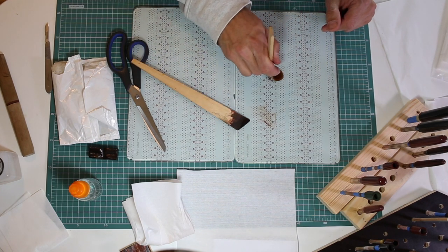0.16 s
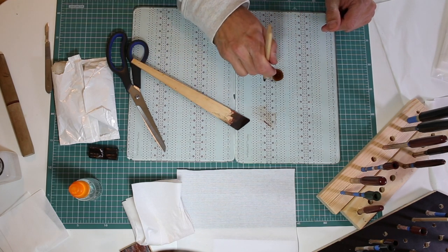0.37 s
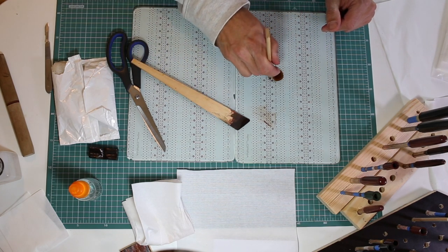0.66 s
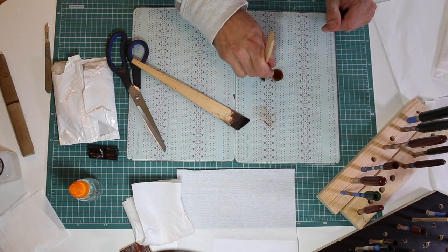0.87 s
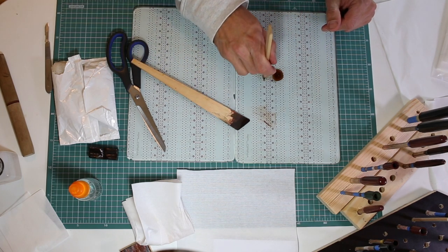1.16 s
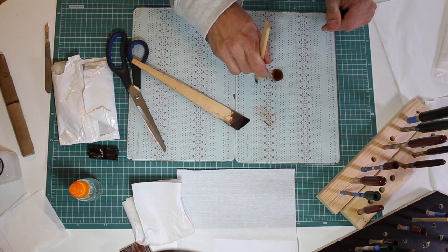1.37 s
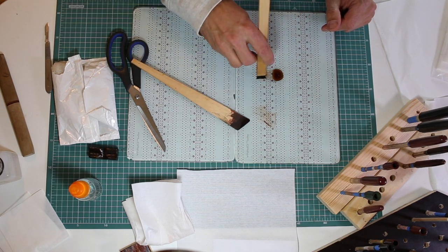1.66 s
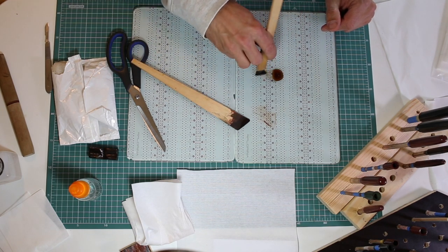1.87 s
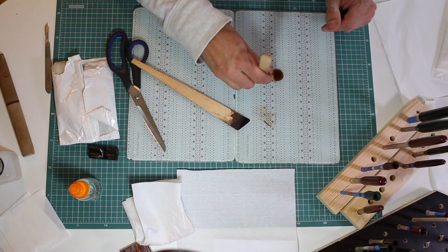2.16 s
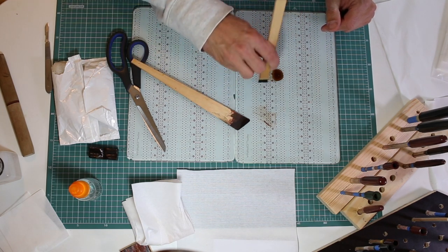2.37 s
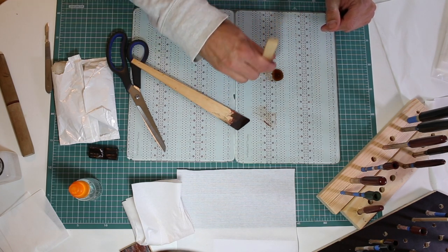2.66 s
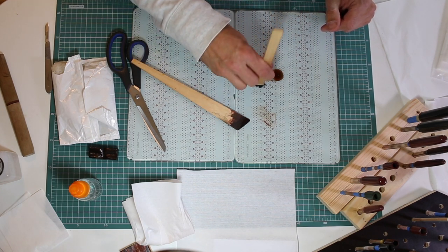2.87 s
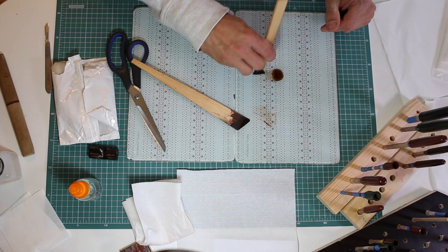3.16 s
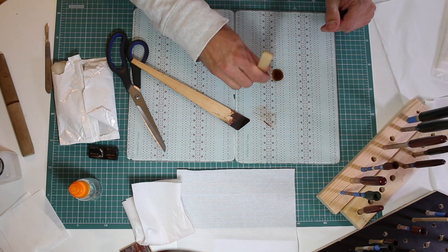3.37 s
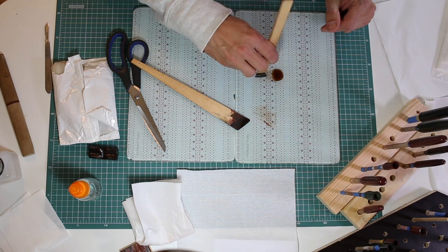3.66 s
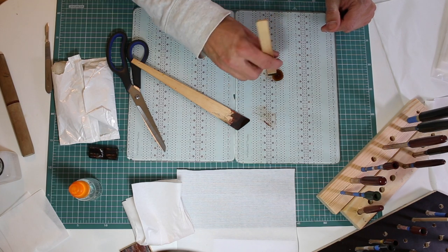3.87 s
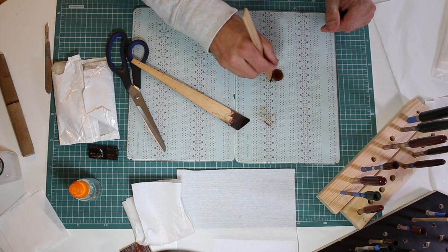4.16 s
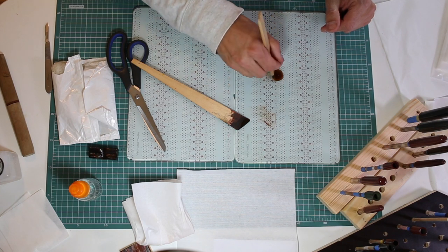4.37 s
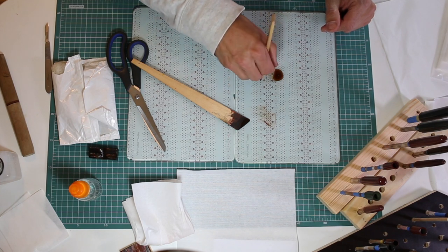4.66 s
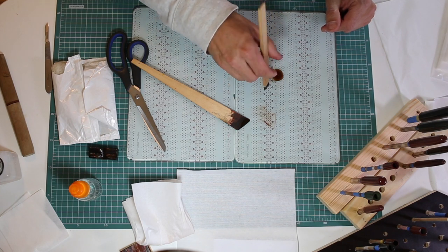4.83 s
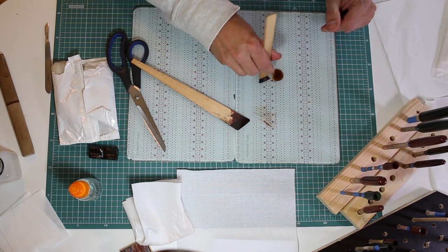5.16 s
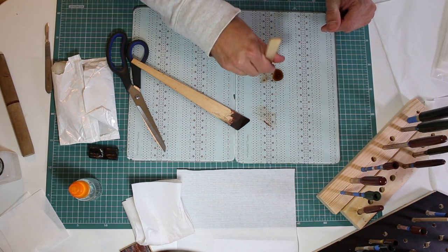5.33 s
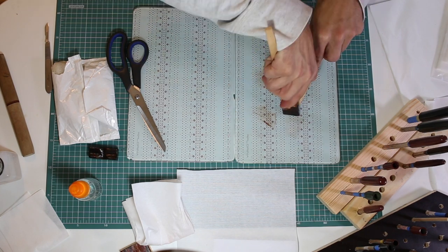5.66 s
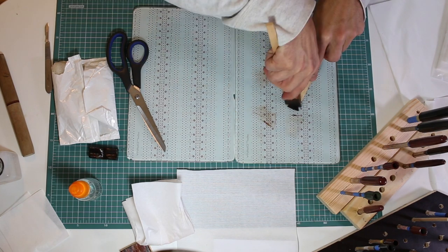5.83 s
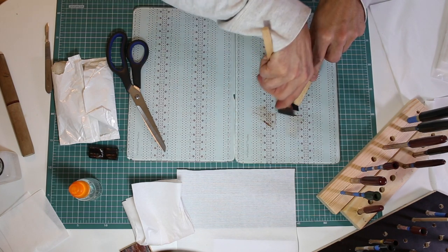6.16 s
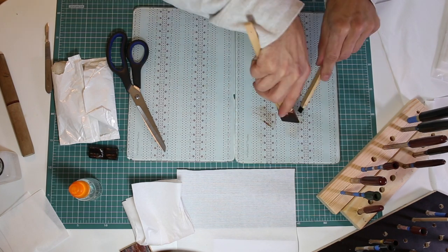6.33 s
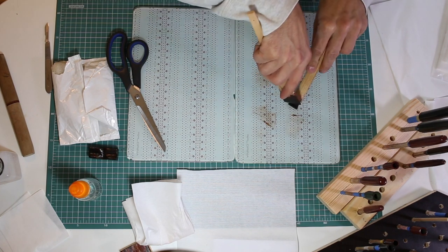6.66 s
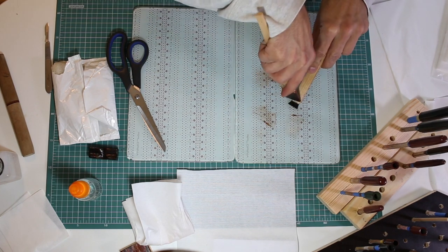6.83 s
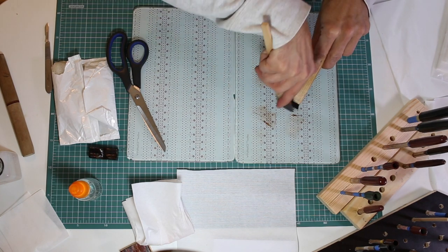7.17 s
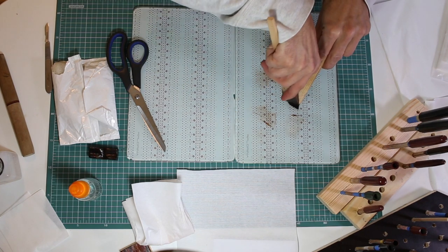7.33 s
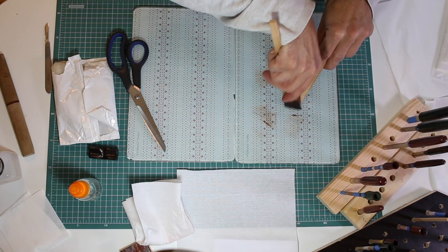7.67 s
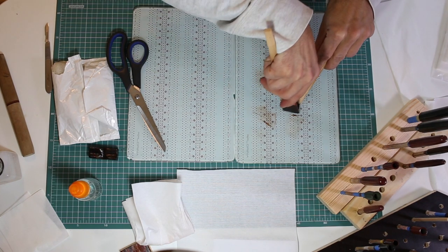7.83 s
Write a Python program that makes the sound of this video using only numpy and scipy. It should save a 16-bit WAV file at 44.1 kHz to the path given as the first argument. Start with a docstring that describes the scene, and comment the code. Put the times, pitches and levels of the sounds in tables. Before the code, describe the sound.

A brush is tapped lightly and turned in the fingers, then a wooden spatula strikes and scrapes it hard, making the table thump.

```python
"""Brush and spatula on a hard plate

A flat brush is dabbed on a hard plate and turned in the fingers, then a wooden spatula strikes and scrapes it out.
Blows ring short wood modes and longer plate modes, and thud in the table; fingers and edge are shaped noise.
Pressing makes the table boom on a low, wavering tone. A small workshop adds echo and a steady hush.
"""
import sys
import numpy as np
from scipy import signal
from scipy.fft import rfft, irfft
from scipy.io import wavfile
from scipy.ndimage import uniform_filter1d

SR = 44100
rng = np.random.default_rng(int(sys.argv[2]) if len(sys.argv) > 2 else 0)


def master_out(mix):
    """Clip the mix to full scale and print it as 16-bit PCM to the path in sys.argv[1]."""
    frames = np.transpose(np.atleast_2d(mix))
    ceiling = np.clip(frames, -1, 1)
    pcm = np.round(ceiling * 32767).astype(np.int16)
    wavfile.write(sys.argv[1], SR, pcm)


N = 352800  # 8 s of samples

# Hush of the workshop, and its level: pitch_hz, density_db_per_hz
AIR_COLOUR = [(15, -10), (25, -11), (59, -10), (75, -5), (140, -1), (184, -3.5), (216, -5), (402, -11),
              (688, -11), (746, -10.5), (1120, -13.5), (3970, -19.5), (6810, -29.5), (11400, -22.5),
              (15700, -28)]
AIR_DB = -57.5
# How long the echo lasts at each pitch: pitch_hz, time_to_fall_60_db_s
ROOM_T60 = [(150, 0.92), (1000, 0.37), (4000, 0.5), (8000, 0.16), (14000, .18)]
# Echo level, delay of the nearest wall and strength of its answer; the echo hears less of plate and table
ROOM_DB, FIRST_WALL_S, WALL_DB, BODY_ROOM_DB = -7, 0.0257, -4, -8

# Presses of the spatula that swing a low table mode:
# full_swing_s, build_up_s, level_db, time_to_fall_60_db_s, deep_shaking_re_level_db
PRESSES = [(5.685, 0.048, -26, 0.46, -12), (5.93, 0.052, -26.5, 0.77, -17), (5.98, .04, -28, .52, -26),
           (6.16, .06, -32.5, 0.25, -9), (6.23, .04, -49.5, 1.7, -3), (6.955, 0.042, -30.5, .9, -21),
           (7.02, 0.093, -28.5, 0.56, -33), (7.13, 0.15, -32, 0.69, -30), (7.395, 0.036, -23.5, 0.21, -17),
           (7.5, 0.16, -33.5, 0.32, -5), (7.71, .04, -27.5, 1, -15), (7.75, 0.057, -26, 0.58, -25)]
BOOM_HZ = 117
# The frame jolts before the mode has built up, and dies in this share of its time
SHAKE_LEAD_S, SHAKE_FADE = 0.023, 0.61

# Colour of one thin, dry tick, as of a fingernail on the handle: pitch_hz, density_db_per_hz
TICK_COLOUR = [(800, -20), (2000, -2), (4100, 0), (6500, -5), (10800, -17), (15500, -35)]
TICK_S, TICK_DB, TICK_T60_S = 3.215, -21, .01

# Fingers and bristles sliding on the handle: full_hiss_s, swell_s, hold_s, fade_s, hiss_db,
# lowest_mode_re_hiss_db, next_two_modes_re_hiss_db, upper_modes_re_hiss_db
RUBS = [(1.38, .03, .003, .04, -68, -11, -13, -6), (1.455, .015, 0.033, .11, -60, -9, -9, -8),
        (1.52, .12, .045, .06, -57, -8, -4, -10), (1.59, 0.14, .012, 0.11, -54.5, -15, -13, -0.5),
        (1.872, .055, .003, .09, -61, -9, -12, -8.5), (2.346, .016, .003, 0.029, -59, -12, -16, -10),
        (2.5, .04, .003, 0.033, -58, -1, -11, -18), (2.868, 0.16, .003, 0.038, -52.5, -4, -9, -20),
        (2.988, 0.18, 0.0028, 0.025, -60.5, -18, -19, -21), (3.36, .012, .003, 0.05, -60, -18, -9, -6),
        (3.41, .011, .003, 0.035, -51.5, -10, -13, -17), (3.5, .028, .003, 0.032, -62.5, -15, -13, -4),
        (3.67, .09, .012, .03, -65, -2, -15, -4), (3.752, .025, .003, .045, -67, -11, -15, -1.5),
        (3.93, 0.019, .003, .035, -59, -15, -15, -2), (3.985, 0.053, .066, .025, -51.5, -15, -5, -2),
        (4.082, .03, .015, .12, -53, -15, -7.5, -1), (4.694, .011, .003, .05, -69, -11, -16, -3.5),
        (4.912, 0.11, .003, .08, -61.5, -16, -2.5, -0.6), (4.968, .04, .003, 0.064, -56, -21, -2, -3),
        (5.022, .07, .003, .085, -57.5, -12, -7, -7), (5.48, .017, .003, .055, -59, -12, -15, -13)]
# Narrow modes of the handle: pitch_hz, width_hz, level_db
HANDLE_MODES = [(2170, 120, 0), (3450, 300, -8), (4880, 320, 0), (7500, 200, -3), (8550, 200, 0),
                (9660, 160, -3), (10800, 160, -3), (12200, 160, -1)]
# Hiss of skin and hair: pitch_hz, density_db_per_hz
SKIN_COLOUR = [(880, -32), (1500, -6), (2220, -3.5), (4130, -4), (4920, -22), (5880, -6), (8540, -1),
               (12200, 0), (15700, -11.5)]

# Drags of the spatula edge over bristles and plate: full_hiss_s, swell_s, hold_s, fade_s, hiss_db,
# wood_rasp_re_hiss_db, plate_rumble_re_hiss_db
SCRAPES = [(5.644, .012, 0.016, .035, -40.5, -9, 2), (5.898, .008, .035, 0.021, -44.5, -2, 6.5),
           (6.129, 0.0048, 0.0024, 0.017, -48, -13, 5), (6.154, 0.025, 0.014, .03, -44, -1, 0.5),
           (6.313, 0.015, 0.045, 0.026, -47, -7.5, -15), (6.41, .05, 0.0091, .06, -58.5, -12, -13),
           (6.478, .012, 0.022, 0.058, -56.5, -6, -7), (6.564, 0.17, .003, 0.084, -64, 7, 5.5),
           (6.634, 0.048, 0.044, 0.069, -50.5, 2.5, -9.5), (6.776, .008, .003, 0.055, -57, 6.5, -6),
           (6.845, .13, .003, .19, -57.5, 4, -7), (6.921, 0.0086, 0.025, 0.055, -47.5, -14, 3.5),
           (7.048, .25, .003, .03, -57, -1, 9), (7.061, .006, 0.026, 0.026, -47, -7, -1),
           (7.285, .04, 0.035, .03, -73.5, 10, 18.5), (7.353, 0.01, 0.022, 0.052, -45, -3, 10),
           (7.42, .03, .003, .06, -48.5, 2, -5), (7.686, .008, 0.055, 0.018, -43.5, 1.5, 4.5)]
# Hiss of the edge over the hair: pitch_hz, density_db_per_hz
EDGE_COLOUR = [(880, -41), (1500, -29.5), (1790, 0), (2200, 1), (2430, -7), (3290, -1), (4170, -2),
               (6110, -3), (10500, 7), (14700, -7), (15700, -25)]
# Wood and plate follow the hiss late, and fade this many times slower
RASP_LAG_S, RASP_FADE, RUMBLE_LAG_S, RUMBLE_FADE = 0.0051, 1.23, 0.008, 1.45

# Blows on the plate: start_s, wood_peak_db, strongest_ring_hz, upper_ring_hz,
# upper_ring_re_strongest_db, crack_re_peak_db, table_thud_re_peak_db
BLOWS = [(0.771, -39, 1031, 1930, -20, -25.5, -7.5), (0.843, -40.5, 963, 2200, -14, -12, -15),
         (1.252, -27, 1190, 2860, -16, -11.5, -11.5), (1.819, -48, 1030, 1900, -18, -14, -17),
         (2.128, -17, 1610, 2470, -15.5, -16, -16), (2.465, -30, 825, 2030, -6.5, -31.5, -13),
         (2.768, -18.5, 1090, 2030, -13, -20, -10), (3.352, -26.5, 1000, 2530, -19.5, -27, -6.5),
         (3.419, -36.5, 1080, 2290, 0, -17.5, -7), (3.63, -32, 980, 2870, -16.5, -18, -11.5),
         (5.189, -44, 703, 2010, -7, -2, -14), (5.468, -24, 1160, 2510, -18.5, -26.5, -11),
         (5.629, -21.5, 1670, 4760, -5, 7.5, -17), (5.672, -20.5, 920, 4120, -17, -17, -11),
         (5.889, -19.5, 1040, 2010, -2, 6.5, -16), (5.929, -14, 1080, 2450, -5.5, -5, -14.5),
         (6.128, -36, 699, 2910, -13, -6.5, -8.5), (6.168, -18.5, 970, 2450, -6, -12, -9.5),
         (6.773, -41, 1070, 2010, -8.5, -9, -31), (6.815, -36.5, 1020, 2040, -6, -17, -26.5),
         (6.877, -33.5, 1040, 1900, -11, -24.5, -28), (6.885, -31.5, 1030, 2420, -6, -16.5, -20),
         (6.915, -26.5, 968, 4170, -2, -0.5, -13), (6.997, -33.5, 1060, 1950, -16, -21.5, -7),
         (7.035, -36, 1090, 2160, -17, -14, -3.5), (7.061, -25, 965, 1960, -8.5, -9, -5.5),
         (7.1, -36, 1080, 2440, 4, 7.5, -5), (7.347, -23, 920, 4570, -8, 12, -7.5),
         (7.424, -12, 990, 1960, -12, -13.5, -10), (7.673, -26, 1025, 4290, -2, 9, -22),
         (7.729, -10.5, 1090, 3020, -6.5, -15, -16.5)]
# Short modes of the wood on the plate, before each blow scales the time:
# pitch_hz, level_db, time_to_fall_60_db_s
WOOD_MODES = [(619, 4, 0.026), (716.3, -2.5, 0.061), (970, -4, 0.035), (1066.6, 3.5, 0.036),
              (1338, -12, 0.093), (1462, 3.5, 0.032), (1610, -2.5, 0.039), (1950, 2.5, 0.035),
              (2450, 6, 0.029), (2608, -3, 0.051), (2860, 5, 0.03), (3560, 0.5, 0.038), (3998, -2, 0.059),
              (4580, -5, 0.032), (4520, 7.5, 0.011)]
# Modes of the table top, before blows() scales the time: pitch_hz, level_db, time_to_fall_60_db_s
TABLE_MODES = [(62.2, -16.5, 0.16), (109.3, -18, 0.32), (155.4, 2.5, 0.12), (183.8, -5.5, 0.1304),
               (226.4, -8.5, 0.11), (298, 5, 0.072), (366.7, -5.5, 0.11), (439.8, 2, 0.071)]
# Lasting plate modes, before blows() scales the time: pitch_hz, level_db, time_to_fall_60_db_s
PLATE_MODES = [(1100, -6, .3), (1440, 0, .45), (1595, -7, .25), (2030, -8, .3), (2450, -13, .25)]
# Crack of the hard edge: pitch_hz, density_db_per_hz
CRACK_COLOUR = [(880, -26), (1500, 2), (2540, -8), (3180, 1.5), (3960, 1.5), (4730, 6.5), (5880, -10),
                (7540, -1.5), (9100, 2.5), (12100, -5.5), (16000, -36)]
# A blow with a weak upper ring is softer: it keeps to its one mode and rings longer
FOCUS_DB_PER_OCTAVE, FOCUS_PER_DB, LENGTH, LENGTH_PER_DB = 2.5, 0.9, 0.44, 0.0219
# Plate ring relative to a 0 dB blow; light blows ring it relatively more
PLATE_DB, PLATE_PER_DB = -36, 0.2169

TOP_HZ = 15750  # the treble ends here


def undb(db):
    """Turn decibels into a plain multiplier."""
    return 10 ** (np.asarray(db) / 20)


def unit(x):
    """Scale a sound to an average (rms) level of 1."""
    return x / np.sqrt(np.mean(x ** 2))


def colour(x, table):
    """Shape a sound's spectrum by (Hz, dB) points, joined on a log pitch scale."""
    hz, db = np.transpose(table)
    bin_hz = np.arange(len(x) // 2 + 1) * SR / len(x) + 1
    gain = undb(np.interp(np.log(bin_hz), np.log(hz), db))
    return unit(irfft(rfft(x) * gain, len(x)))


def band(x, hz, width_hz):
    """Keep one band of pitches, as a single resonance does."""
    return unit(signal.lfilter(*signal.iirpeak(hz, hz / width_hz, SR), x))


def walk(rate):
    """Wander smoothly between random values, `rate` of them per second, with an rms of 1."""
    step = int(SR / rate)
    held = np.repeat(rng.standard_normal(N // step + 1), step)
    return unit(uniform_filter1d(held, step)[:N])


def grit(spread_db):
    """Make the noise of dense slips of uneven size."""
    size = np.minimum(rng.exponential(size=N), 5.5)
    return unit(rng.standard_normal(N) * undb(spread_db * size))


def strokes(s, rise_s, hold_s, fall_s, db):
    """Swell 20 dB in rise_s up to time s, hold, and fall 20 dB in fall_s; the loudest swell counts."""
    t, level = np.arange(N) / SR, np.zeros(N)
    for at, rise, hold, fall, peak_db in np.broadcast(s, rise_s, hold_s, fall_s, db):
        # each swell is followed down to 40 dB below its peak
        near = slice(max(int((at - 2 * rise) * SR), 0), int((at + hold + 2 * fall) * SR))
        before = (at - t[near]) / rise
        after = (t[near] - at - hold) / fall
        under = np.maximum(np.maximum(before, after), 0)
        level[near] = np.maximum(level[near], undb(peak_db - 20 * under))
    return level


def ring(modes, t, gain_db, swell, length):
    """Sum decaying modes under a swell that stands for the contact time; the peak is 1."""
    hz, db, t60 = np.transpose(modes)[:, :, None]
    decay = undb(db + gain_db[:, None] - 60 * t / (t60 * length))
    x = (decay * np.sin(2 * np.pi * hz * t)).sum(axis=0) * swell
    return x / np.abs(x).max()


def air():
    """Steady workshop hush, coloured from noise; only its bass swells and sinks."""
    hush = colour(rng.standard_normal(N), AIR_COLOUR)
    bass = signal.lfilter(*signal.butter(1, 400, fs=SR), hush)
    bass_gain = undb(0.47 * walk(2.48))
    return undb(AIR_DB) * (hush + (bass_gain - 1) * bass)


def room(x):
    """Diffuse echo, octave by octave, filling in until the nearest wall answers with a short cluster."""
    t = np.arange(int(.7 * SR)) / SR
    hz, t60 = np.transpose(ROOM_T60)
    tail = np.zeros(len(t))
    for f in 125 * 2. ** np.arange(7):
        fade = undb(-60 * t / np.interp(np.log(f), np.log(hz), t60))
        # a wider octave holds more noise
        tail += band(rng.standard_normal(len(t)), f, f * 0.642) * np.sqrt(f) * fade
    fill_in = np.clip(t / FIRST_WALL_S, 0, 1) ** 0.48
    cluster = np.exp(-((t - FIRST_WALL_S - .008) / 0.0019) ** 2)
    tail *= fill_in * (1 + undb(WALL_DB) * cluster)
    return signal.fftconvolve(x, tail / np.sqrt(np.sum(tail ** 2)))[:N]


def boom():
    """Pressure swings one low table mode, wavering a little in pitch, over an irregular deep shaking."""
    s, rise, db, t60, deep_db = np.transpose(PRESSES)
    fall = t60 * 20 / 60  # strokes() wants the time to fall 20 dB
    phase = np.cumsum(BOOM_HZ * (1 + 0.006 * walk(6.6))) / SR
    tone = np.sqrt(2) * np.sin(2 * np.pi * phase)
    deep = band(band(rng.standard_normal(N), 75, 60), 75, 60)
    shaking = strokes(s - SHAKE_LEAD_S, rise, 0, fall * SHAKE_FADE, db + deep_db) * deep
    return strokes(s, rise, 0, fall, db) * tone + shaking


def tick():
    """One sharp slip with a few milliseconds of crackle behind it."""
    t = np.arange(N) / SR - TICK_S
    slip = np.arange(N) == int(TICK_S * SR)
    crackle = .12 * rng.standard_normal(N) * undb(-60 * np.abs(t) / TICK_T60_S) * (t > 0)
    x = colour(slip + crackle, TICK_COLOUR)
    return undb(TICK_DB) * x / np.abs(x).max()


def rub():
    """Skin and hair hiss unevenly and excite the narrow modes of the handle, now one, now another."""
    *shape, db, low_db, mid_db, top_db = np.transpose(RUBS)
    modes = [undb(level_db + 2 * walk(13)) * band(grit(2.1), hz, width_hz)
             for hz, width_hz, level_db in HANDLE_MODES]
    low = strokes(*shape, db + low_db) * modes[0]
    mid = strokes(*shape, db + mid_db) * sum(modes[1:3])
    top = strokes(*shape, db + top_db) * unit(sum(modes[3:]))
    hiss = strokes(*shape, db) * colour(grit(2.5), SKIN_COLOUR)
    return undb(1.2 * walk(80)) * (hiss + low + mid + top)


def scrape():
    """The edge hisses over the hair in jerks, rasps in the spatula and rumbles in wood and table modes."""
    s, rise, hold, fall, db, rasp_db, rumble_db = np.transpose(SCRAPES)
    hiss = strokes(s, rise, hold, fall, db) * colour(grit(3.8), EDGE_COLOUR)

    rasp = band(grit(0.67), 2070, 552)
    rasp += undb(-2) * band(grit(4.3), 2400, 1150)
    rasp += undb(-13) * band(grit(2), 3840, 400)
    rasp_level = strokes(s + RASP_LAG_S, rise, hold, fall * RASP_FADE, db + rasp_db)

    # the same slips drive every rumbling mode; a short-lived mode is a wide band
    slips = grit(1.68)
    rumble = sum(undb(level_db) * band(slips, hz, 3.1 / t60)
                 for hz, level_db, t60 in WOOD_MODES[:6] + TABLE_MODES[2:])
    rumble_level = strokes(s + RUMBLE_LAG_S, rise, hold, fall * RUMBLE_FADE, db + rumble_db)

    return undb(1.4 * walk(90)) * (hiss + rasp_level * unit(rasp) + rumble_level * unit(rumble))


def blows():
    """Each blow rings the modes near its spot and cracks; plate ring and table thud build up a little later."""
    sharp, body, t = np.zeros(N + SR), np.zeros(N + SR), np.arange(SR // 2) / SR
    octave = np.log2(np.array(WOOD_MODES)[:, 0])
    count = len(WOOD_MODES)
    late = np.clip(t / 0.034, 0, 1) ** 2
    for s, db, hz, upper_hz, upper_db, crack_db, thud_db in BLOWS:
        # modes are weaker the further they lie from the two favoured pitches
        focus_db = FOCUS_DB_PER_OCTAVE - FOCUS_PER_DB * upper_db
        length = LENGTH - LENGTH_PER_DB * upper_db
        main_db = -focus_db * np.abs(octave - np.log2(hz))
        spot_db = np.maximum(main_db, upper_db - 11 * np.abs(octave - np.log2(upper_hz)))

        # each blow's modes are moved slightly in pitch at random
        detune = 1 + .012 * rng.standard_normal(count)
        detuned = WOOD_MODES * np.c_[detune, np.ones((count, 2))]
        contact_swell = 1 - np.exp(-t / 0.0011)
        wood = ring(detuned, t, spot_db + rng.standard_normal(count), contact_swell, max(length, .2))

        # one sharp contact and a short chatter, coloured by the hard edge
        chatter = 0.17 * rng.standard_normal(len(t)) * np.exp(-t / 0.0036)
        contact = (np.arange(len(t)) == 12) + chatter
        crack = colour(contact, CRACK_COLOUR) * np.exp(-t / 0.024)
        crack /= np.abs(crack).max()

        thud = ring(TABLE_MODES, t, rng.standard_normal(len(TABLE_MODES)), late, 0.83)
        plate = ring(PLATE_MODES, t, 3.0 * rng.standard_normal(len(PLATE_MODES)), late, 0.98)
        plate *= undb(1.44 * walk(39.0)[:len(t)])
        plate_db = PLATE_DB - PLATE_PER_DB * db

        i = int(s * SR)
        sharp[i:i + len(t)] += undb(db) * (wood + undb(crack_db) * crack)
        body[i:i + len(t)] += undb(db) * (undb(thud_db) * thud + undb(plate_db) * plate)
    return sharp[:N], body[:N]


def scene():
    """Mix all sources into one channel; the boom and the hush get no echo."""
    sharp, body = blows()
    near = sharp + tick() + rub() + scrape()
    echo = undb(ROOM_DB) * room(near + undb(BODY_ROOM_DB) * body)
    return (near + echo + body + boom() + air())[None]


def record(dry):
    """Cut the top of the treble with a steep low-pass filter."""
    return signal.sosfilt(signal.ellip(10, .2, 70, TOP_HZ, fs=SR, output="sos"), dry)


dry = scene()
out = record(dry)
master_out(out)
```